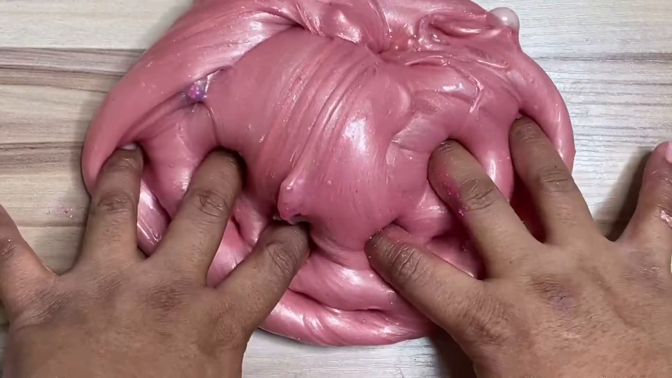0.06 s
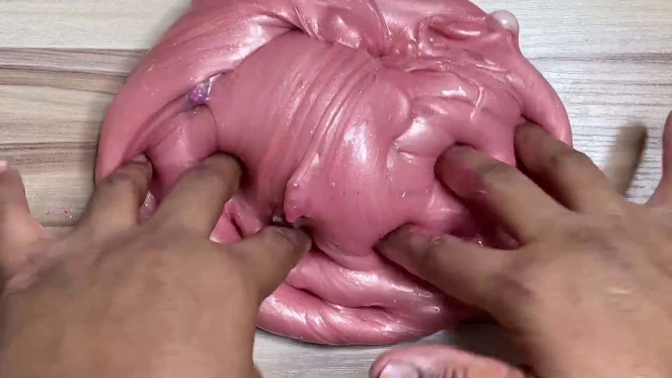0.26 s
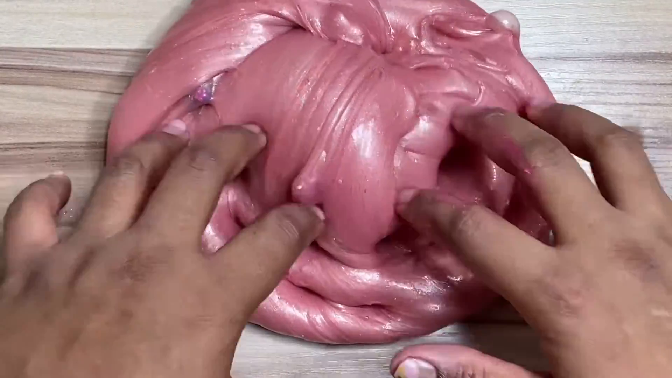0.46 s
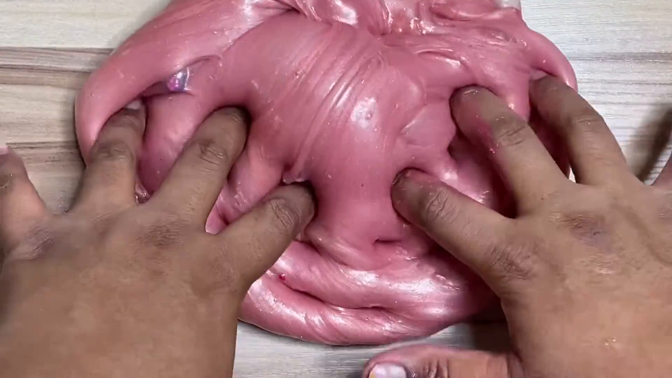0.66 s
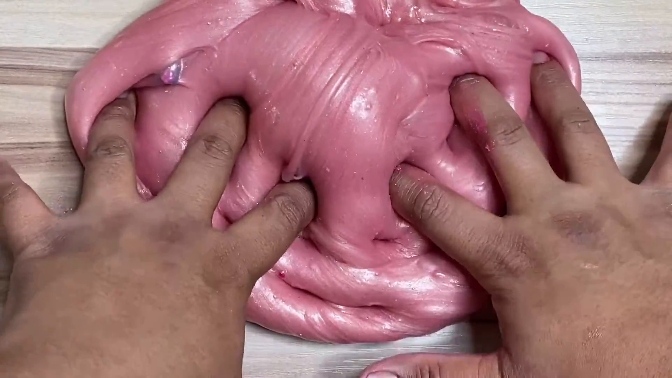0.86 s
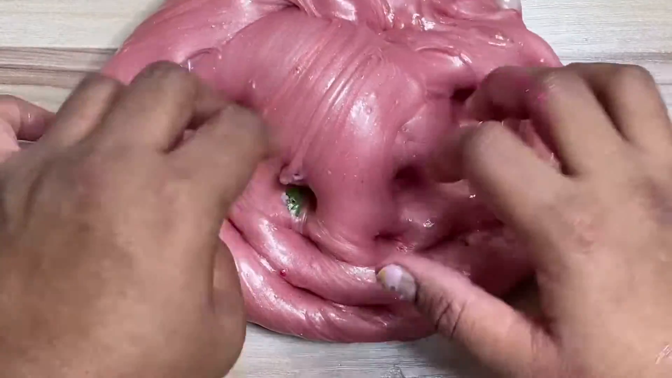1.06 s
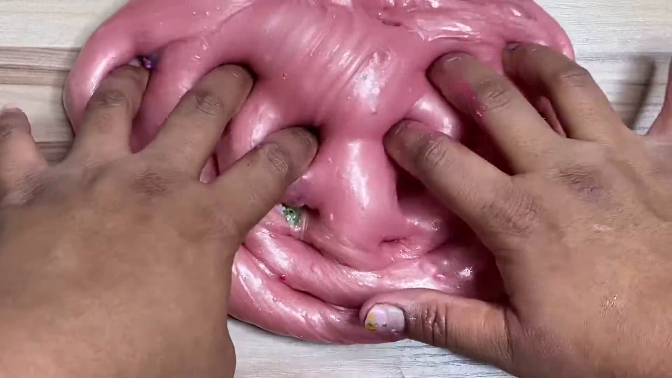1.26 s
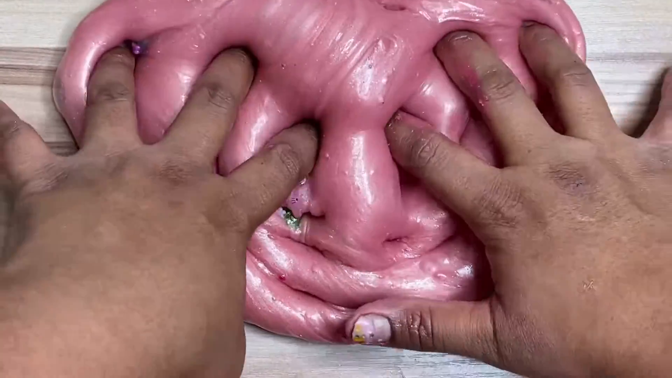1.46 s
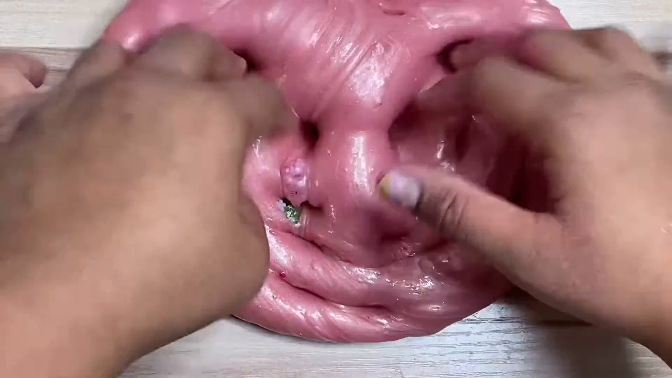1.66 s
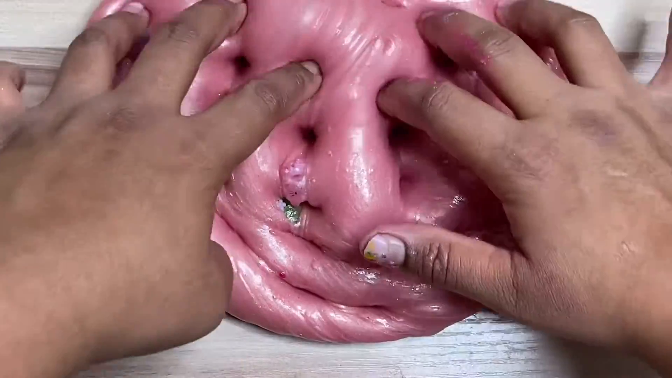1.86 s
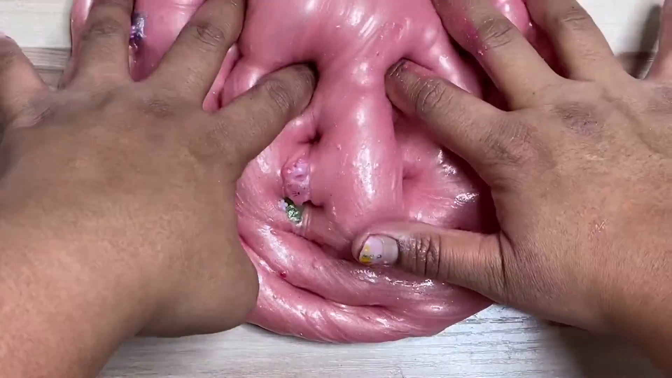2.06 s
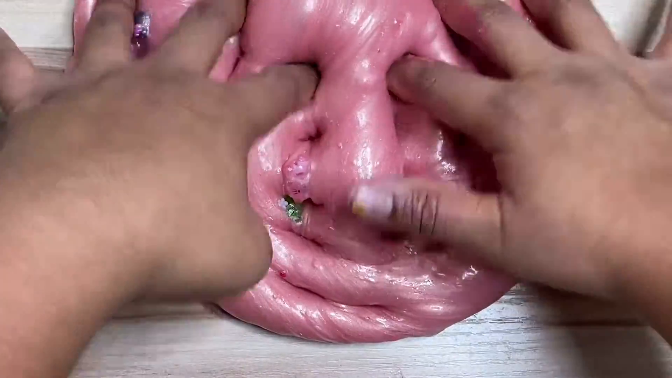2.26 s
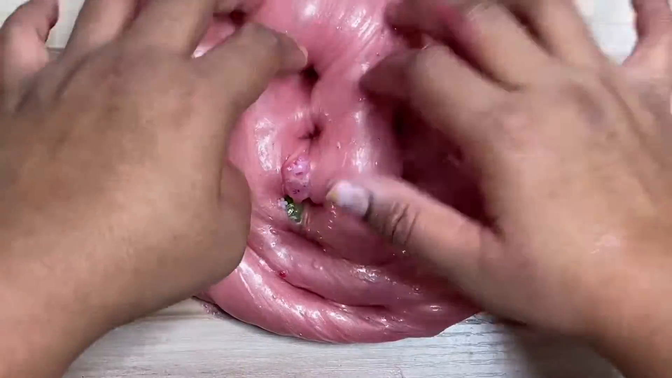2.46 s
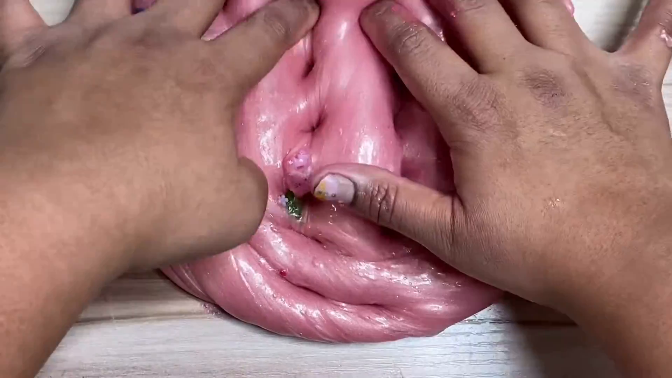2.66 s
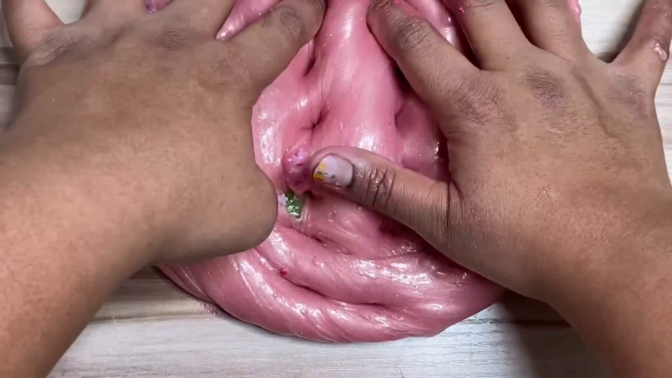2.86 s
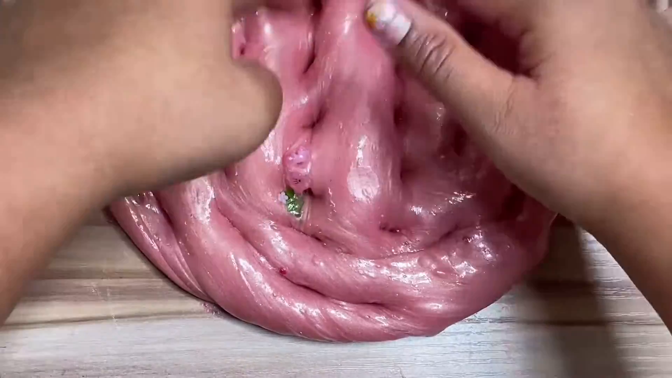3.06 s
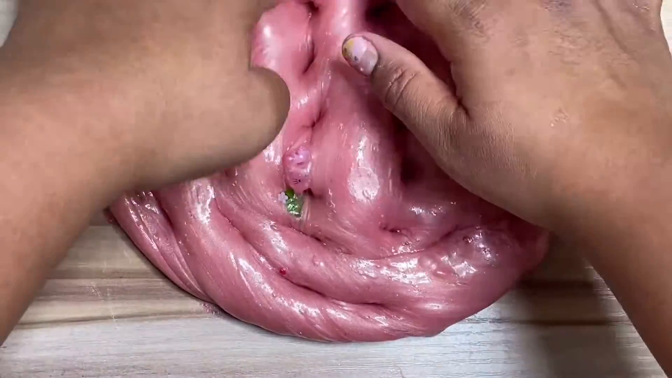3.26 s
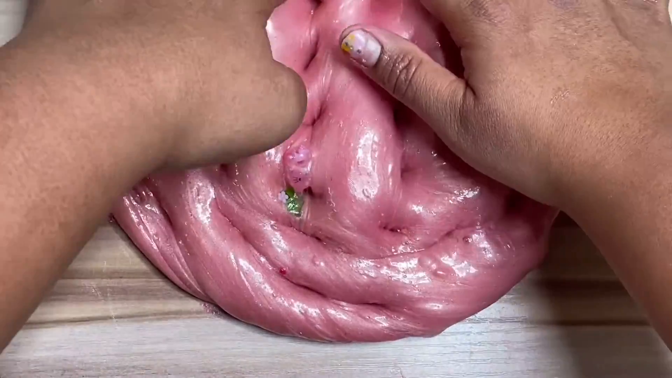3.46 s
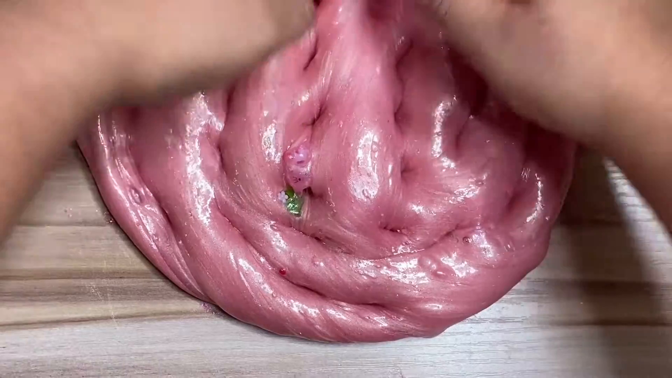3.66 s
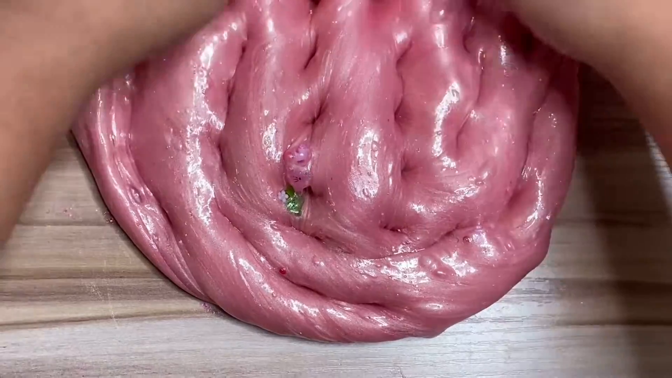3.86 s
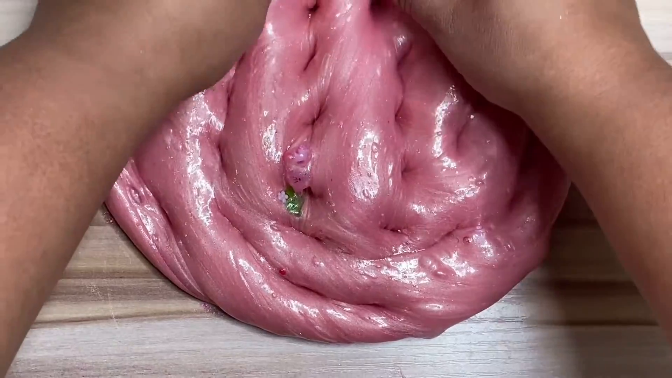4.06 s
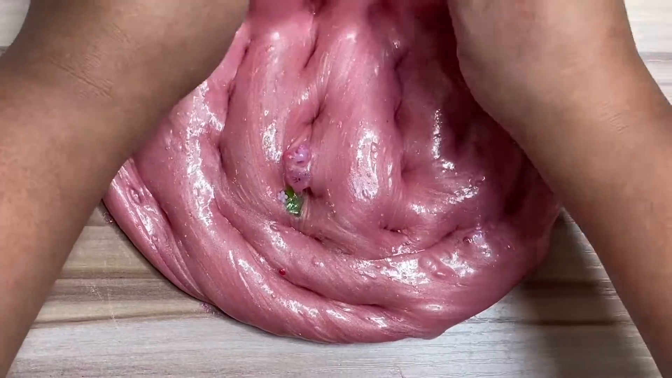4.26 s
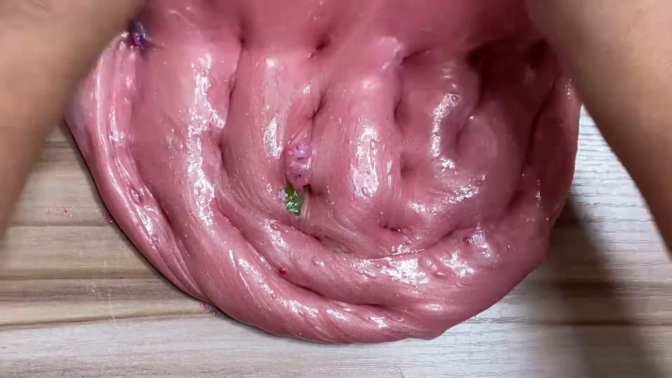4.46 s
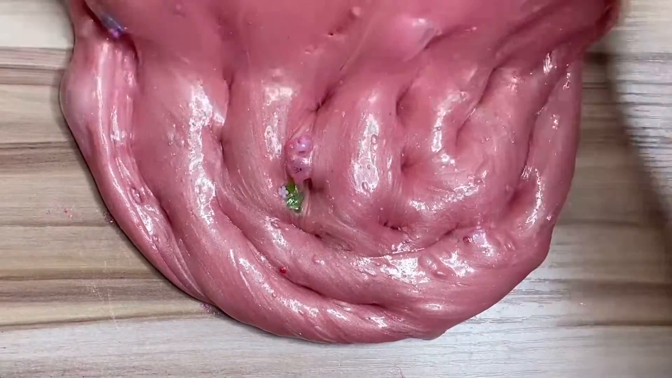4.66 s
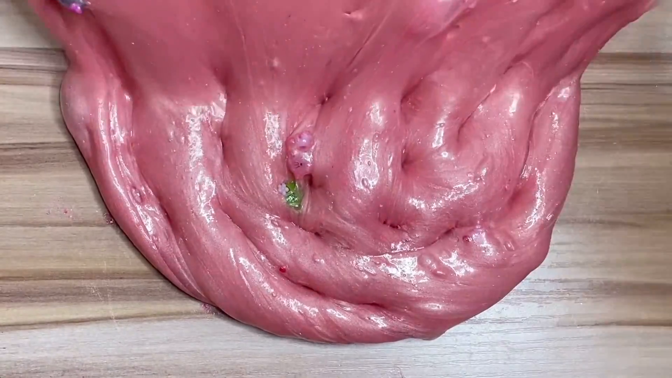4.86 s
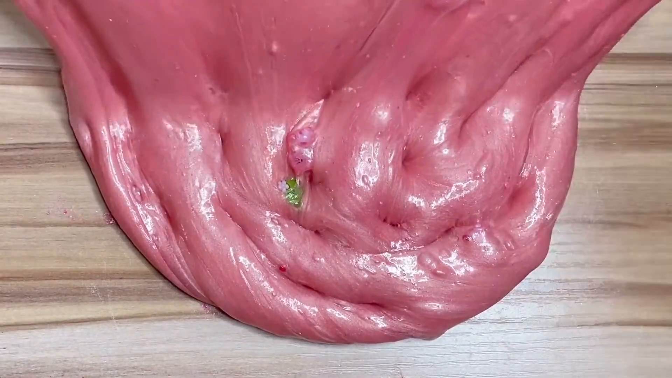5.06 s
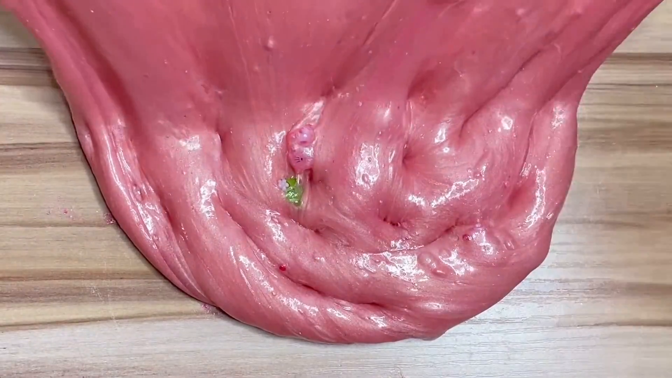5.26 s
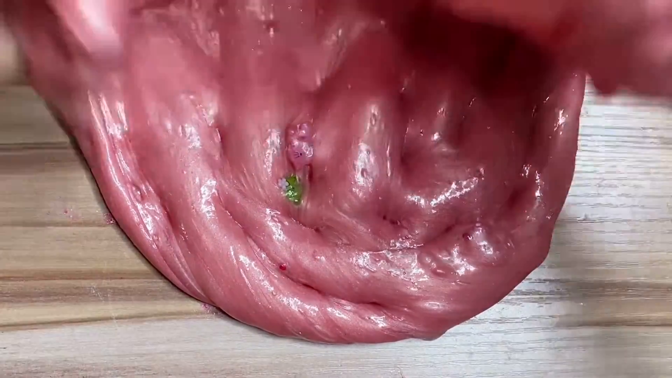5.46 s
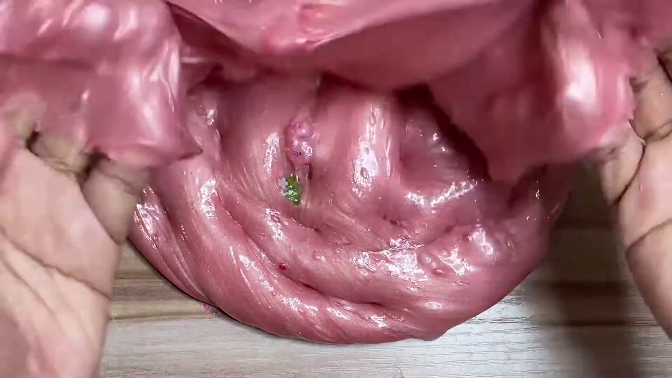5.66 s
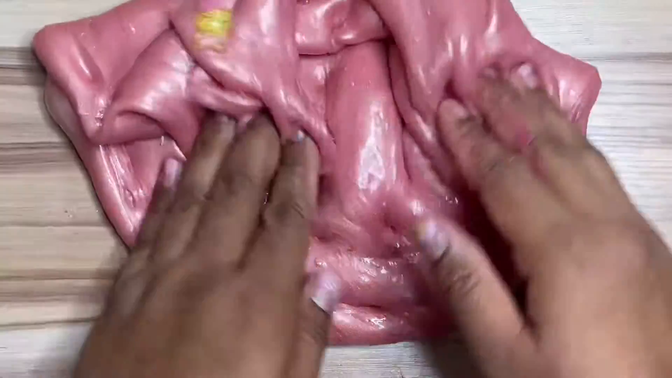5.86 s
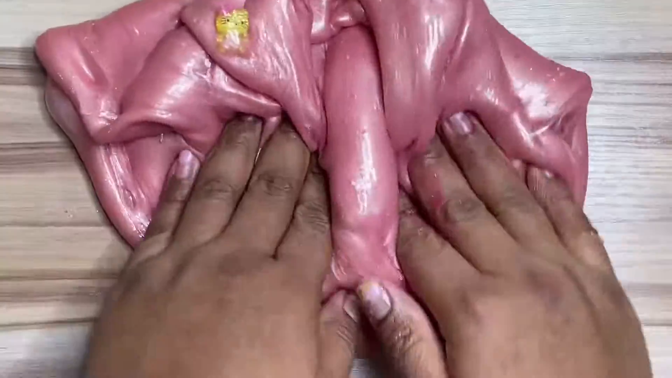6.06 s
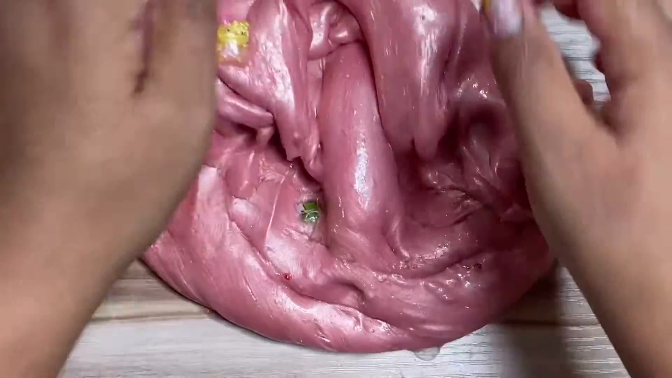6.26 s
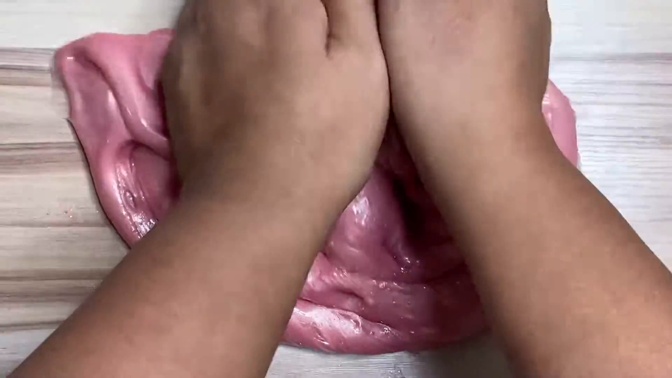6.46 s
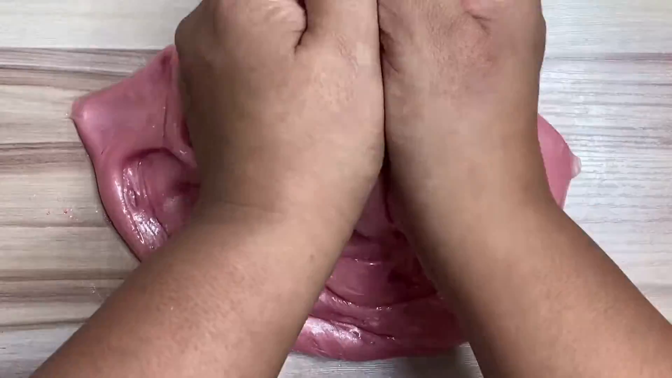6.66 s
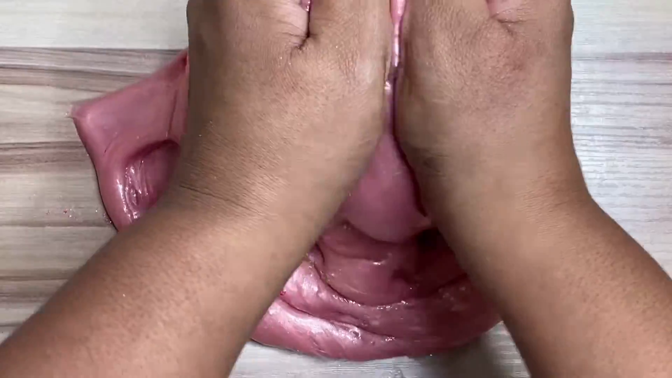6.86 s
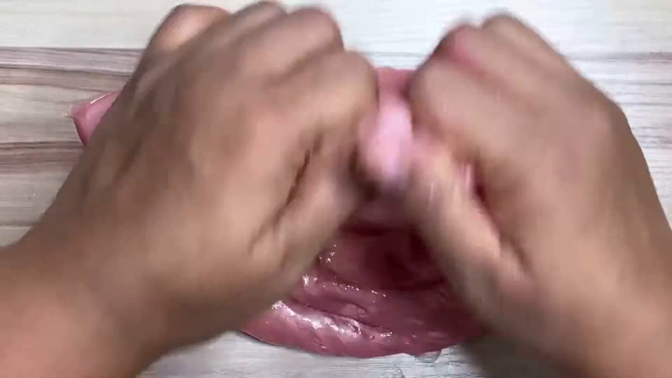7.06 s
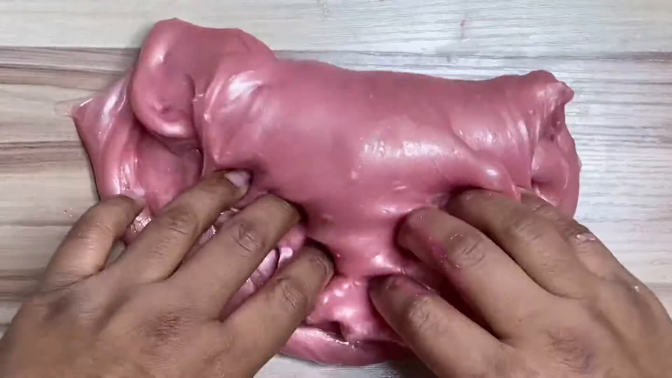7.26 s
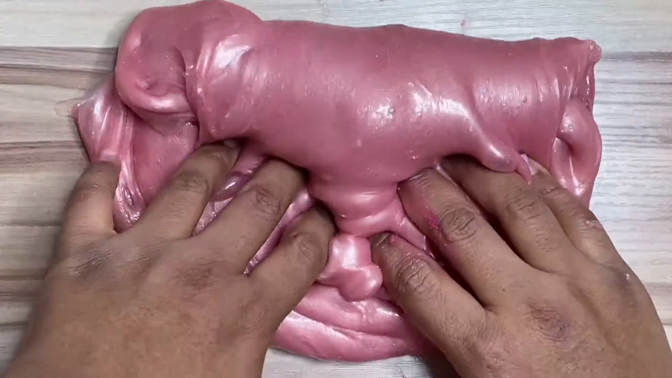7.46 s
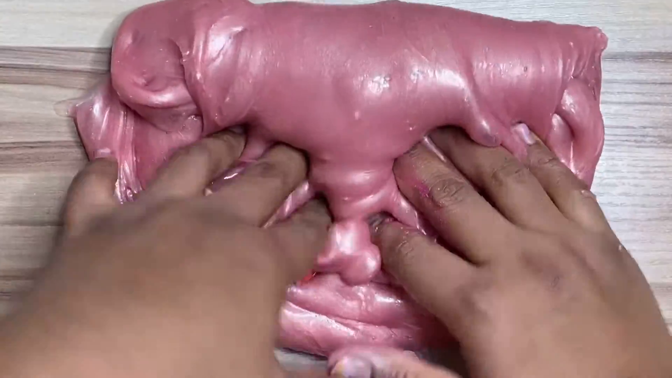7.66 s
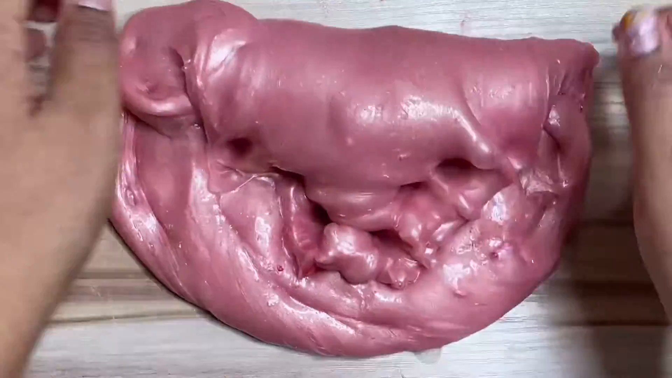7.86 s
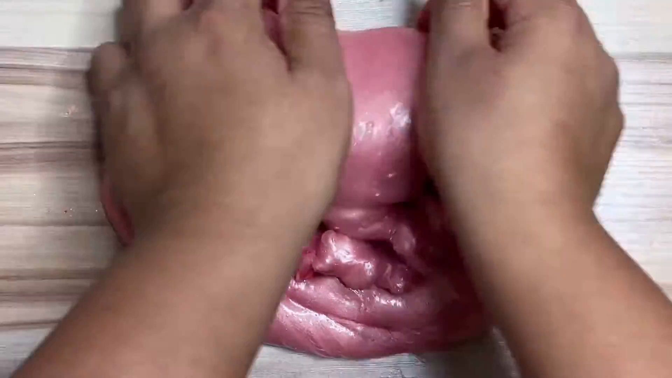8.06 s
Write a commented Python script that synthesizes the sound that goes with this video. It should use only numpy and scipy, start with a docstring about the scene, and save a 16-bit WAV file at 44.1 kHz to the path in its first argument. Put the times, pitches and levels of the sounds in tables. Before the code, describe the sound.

Six regular bursts of sharp, sticky snapping come from hands pressing wet slime, each with a dull table thump and a fizzing edge. A low flutter of air buffets the microphone, followed by sparse, faint ticks during stretching. Folding brings low thuds, then the loudest hollow pops, a pause and another cluster of cracks. The stereo sound is very close, in a quiet, lively little room.

```python
"""Clusters of wet cracks burst out close by as fingers poke, stretch and fold glossy slime on a table.
Each burst is torn noise that rings an air pocket, a damped resonance; presses excite lower resonances.
Peeling slime crackles as random grains and ticking bubbles, and the table rumbles as coloured noise.
Midway, as the arms reach forward, moving air buffets the microphone; a small bare room echoes the slime.
"""
import sys
import numpy as np
from scipy import signal
from scipy.fft import rfft, irfft, next_fast_len
from scipy.io import wavfile
from scipy.ndimage import uniform_filter1d

SR = 44100
rng = np.random.default_rng(int(sys.argv[2]) if len(sys.argv) > 2 else 0)


def wav_record(signal):
    """Record a signal, one row per channel, as 16-bit PCM in the file named by sys.argv[1]."""
    frames = np.transpose(np.atleast_2d(signal))
    bounded = np.clip(frames, -1, 1)
    # unit amplitude maps onto the largest positive 16-bit level
    quanta = np.round(bounded * 32767).astype(np.int16)
    wavfile.write(sys.argv[1], SR, quanta)


N = 358533
TIME = np.arange(N) / SR

# The mass gives way under the hands or lands on the table. Each row: start in seconds, relative squelch
# level in dB, squelch centre in Hz, squelch 60 dB decay in seconds, relative thump level in dB,
# crackle level in dB, crackle build-up in seconds.
PRESSES = [(.305, -23, 433, .12, -32, -49.5, .022), (1.009, -21, 379.5, 0.2, -30, -50, 0.031),
           (1.673, -19.5, 406, 0.13, -27.5, -53, 0.025), (2.366, -27, 448.5, 0.11, -30.5, -63.5, .025),
           (3.087, -33, 400, 0.11, -31.5, -57, 0.059), (3.717, -42, 401, .08, -34, -57, 0.039),
           (4.44, -48.5, 328, .06, -41, -51, 0.019), (4.821, -43.5, 310, 0.044, -55, -59, .01),
           (5.501, -40, 219, 0.098, -51, -62, .008), (6.185, -37, 219, 0.18, -34, -46, 0.021),
           (6.383, -28, 193, 0.053, -31, -44, .004), (6.56, -33.5, 229, .08, -30.5, -49.5, .006),
           (6.728, -31, 420, 0.16, -48.5, -58, .01), (7.747, -21, 342, 0.097, -28, -54.5, 0.03),
           (7.96, -35.5, 235, 0.024, -37, -46.5, .008)]
THUMP_LAG_S = 0.012  # the push reaches the table just after the squelch


def pops(rise_s, snap_s, fizz_s, ring_cycles, width, snap_db, fizz_db, ring_db):
    """Impulsive excitation of a damped resonator: a snap, a wet fizz and air ringing in a soft pocket."""
    # Bursting air pockets. Each row: time in seconds, relative snap level in dB, relative fizz level in dB,
    # pocket resonance in Hz, relative ring level in dB.
    bursts = [(0.098, -64, -61, 4370, -72.5), (0.285, -52.5, -58.5, 800, -47.5),
              (0.2921, -28.5, -21.5, 710, -30.5), (.3051, -23.5, -9.5, 655, -26),
              (0.3076, -27.5, -15.5, 1290, -20.5), (1.0041, -24.5, -6.5, 3740, -16.5),
              (1.009, -38, -15, 590, -16.5), (1.031, -30, -36, 1260, -19.5), (1.0426, -17, -9.5, 4280, -33),
              (1.399, -54, -43.5, 4630, -53.5), (1.4361, -46, -24, 4690, -35),
              (1.6523, -30, -19, 2010, -32.5), (1.6565, -23, -18.5, 1640, -23.5),
              (1.667, -15.5, -21, 4400, -28), (1.6762, -32, -15.5, 1010, -19),
              (1.6827, -25.5, -26, 1600, -31), (1.9553, -46.5, -66, 800, -42.5),
              (2.035, -52.5, -53.5, 3000, -48.5), (2.7, -63.5, -59.5, 2000, -65.5),
              (2.3377, -28, -15, 3340, -21), (2.3471, -22.5, -5, 1690, -23),
              (2.3649, -24.5, -22, 4500, -19), (2.3672, -33, -15, 716, -24.5),
              (2.3726, -40, -7.5, 4000, -23), (3.056, -44.5, -34.5, 650, -44.5),
              (3.064, -20, -13.5, 4650, -22), (3.0862, -18.5, -17.5, 663, -21),
              (3.091, -28, -15.5, 650, -19.5), (3.0921, -28, -28, 1240, -28),
              (3.2488, -65, -41.5, 850, -66.5), (3.701, -38.5, -23, 3890, -42),
              (3.7053, -23.5, -11.5, 3820, -48), (3.7297, -29, -15, 887, -18),
              (4.1558, -31.5, -41, 2820, -44), (4.3571, -45.5, -25.5, 4760, -31),
              (4.4478, -19.5, -20.5, 2400, -48), (4.502, -58, -19, 3430, -29.5),
              (4.5846, -38.5, -24.5, 3960, -29), (4.6758, -46, -25, 2350, -36),
              (4.683, -54, -22, 4000, -54), (4.8214, -24.5, -13.5, 1840, -21),
              (4.9414, -46, -68.5, 2190, -38.5), (5.1049, -46.5, -51, 2250, -32.5),
              (5.3207, -52.5, -34, 4290, -33), (5.4995, -52, -55.5, 1540, -41),
              (5.6148, -57, -58, 2200, -43), (5.7825, -43.5, -60, 1430, -40.5),
              (5.912, -38, -34.5, 1910, -41.5), (5.988, -40.5, -45, 1240, -40),
              (6.0064, -41, -49, 1500, -41.5), (6.387, -39.5, -65, 560, -29),
              (6.5633, -33, -39, 466, -24.5), (6.6207, -30.5, -36, 3040, -37),
              (6.6698, -66, -24, 4760, -57), (6.6832, -44, -22, 4380, -56), (6.711, -25.5, -14, 4280, -30),
              (6.7227, -53, -16.5, 5010, -20.5), (6.8197, -15.5, -29, 4010, -5.5),
              (6.8365, -20, -12.5, 915, -25.5), (6.921, -21.5, -26, 2700, -28),
              (6.948, -10.5, -11.5, 2444, -4), (6.9499, -20, -21, 2030, -7.5),
              (6.9508, -17, -26.5, 1120, -19), (7.131, -34.5, -34.5, 4590, -40),
              (7.389, -48.5, -49, 2400, -49), (7.398, -40.5, -46, 2300, -56),
              (7.7387, -22, -19.5, 2060, -25), (7.7529, -28.5, -25.5, 470, -18),
              (7.7643, -27, -20, 4970, -35), (7.7795, -24, -23.5, 416, -24.5),
              (7.952, -41, -59, 590, -32.5)]
    # Spectra of snap and fizz. Each row: frequency in Hz, relative level in dB.
    snap_spectrum = [(150, -21.5), (400, -6), (900, -5), (1500, -5), (2200, -3.5), (3200, -3.5),
                     (5200, -1.5), (7000, -7), (12000, -27)]
    fizz_spectrum = [(1500, -32), (4500, -7.5), (6500, -2), (9500, 0), (12000, -6), (15300, -1.5),
                     (16500, -15)]
    snaps, fizzes, rings = np.zeros((3, N))
    t = TIME[:SR // 20] - TIME[SR // 80]  # begins before the rip, which is at t = 0
    noises = rng.standard_normal((len(bursts), 3, len(t)))
    for (s, snap, fizz, hz, ring), noise in zip(bursts, noises):
        start = s + t[0]
        snap_sound = tear(noise[0], t, rise_s, snap_s)
        fizz_sound = tear(noise[1], t, rise_s, fizz_s)
        puff = tear(noise[2], t, rise_s, ring_cycles / hz)
        ring_sound = signal.sosfilt(resonance(hz, width), puff)
        add(snaps, start, at_level(snap_sound, snap + snap_db))
        add(fizzes, start, at_level(fizz_sound, fizz + fizz_db))
        add(rings, start, at_level(ring_sound, ring + ring_db))
    return colour(snaps, snap_spectrum) + colour(fizzes, fizz_spectrum) + rings


def tear(noise, t, rise_s, decay_s):
    """Sudden release of tension: a strained film creaks faintly, then at t = 0 rips open in a brief rush."""
    strain_db, strain_s = -23, 0.002  # creak relative to the rush; its decay to either side of the rip
    after = np.maximum(t, 0)
    rush = (1 - np.exp(-(after / rise_s) ** 2)) * np.exp(-after / decay_s)
    creak = from_db(strain_db) * np.exp(-np.abs(t) / strain_s)
    return noise * (rush / rush.max() + creak)


def thuds(width, rise_s, level_db):
    """Low resonances excited by a shove: the soft mass squelches, then thumps on the table."""
    thump_hz, thump_t60_s = 143, 0.13
    out = np.zeros(N)
    noises = rng.standard_normal((len(PRESSES), 2, SR // 4))
    for (s, squelch_db, hz, t60, thump_db, *_), noise in zip(PRESSES, noises):
        squelch = shudder(noise[0], hz, t60, width, rise_s)
        thump = shudder(noise[1], thump_hz, thump_t60_s, width, rise_s)
        add(out, s, at_level(squelch, squelch_db + level_db))
        add(out, s + THUMP_LAG_S, at_level(thump, thump_db + level_db))
    return out


def shudder(noise, hz, t60, width, rise_s):
    """Exponential decay in a heavily damped mode: a noisy shove dies away in a broad resonance."""
    t = TIME[:len(noise)]
    shove = noise * (1 - np.exp(-t / rise_s)) * from_db(-60 * t / t60)
    return signal.sosfilt(resonance(hz, width), shove)


def crackle(peel_db, per_s, busy_db, spread_db, rub, grain_s):
    """Random (Poisson-like) grains: sticky threads snap more often under harder peeling, over a skin rub."""
    # Each row: frequency in Hz, relative level in dB.
    crackle_spectrum = [(200, -18.5), (900, -3.5), (2200, -4), (4500, -6.5), (7000, -9), (10000, -11),
                        (16000, -12)]
    rate = per_s * from_db(np.minimum(peel_db - busy_db, 0)) ** 2  # snaps per second, full at busy_db
    born = rng.random(N) < rate / SR
    sizes = from_db(spread_db * np.minimum(rng.exponential(1, N), 3)) * born
    # each snap dies away exponentially
    envelope = signal.lfilter([1], [1, -np.exp(-1 / (grain_s * SR))], sizes + 1e-18)
    grains = 0.5 * (rms_one(envelope) + rub) * rng.standard_normal(N)
    return colour(grains * from_db(peel_db), crackle_spectrum)


def tiny_bubbles(peel_db, per_s, low_hz, high_hz, q, spread_db, level_db, count):
    """Resonance of small cavities: pinhead bubbles tick open at random, each dealt one of a set of pitches."""
    born = rng.random(N) < per_s / SR
    sizes = from_db(spread_db * np.minimum(rng.exponential(1, N), 2)) * born
    dealt = rng.integers(0, count, N)
    ticks = np.zeros(N)
    for k, hz in enumerate(np.geomspace(low_hz, high_hz, count)):
        b, a = signal.iirpeak(hz, q, fs=SR)
        ticks += signal.lfilter(b, a, sizes * (dealt == k) + 1e-18) / np.sqrt(hz)
    return rms_one(ticks) * from_db(peel_db + level_db)


def peeling():
    """Power addition of two causes: slime peels off skin around each press and while the sheet stretches."""
    # Lifting, stretching and folding the sheet. Each row: time in seconds, crackle level in dB.
    stretch = [(3.7, -89.5), (4.1, -67), (4.58, -53.5), (4.9, -63), (5.3, -62.5), (5.45, -69), (5.8, -58),
               (6.1, -69), (6.35, -72), (6.48, -56.5), (7.1, -50), (7.4, -72.5), (7.92, -75), (8.07, -54.5)]
    cling_fall_s = 0.06  # slime clings to the skin after each press
    s, *_, crackle_db, build_up_s = np.transpose(PRESSES)
    cling = swells(s, crackle_db, build_up_s, cling_fall_s)
    return 20 * np.log10(np.hypot(cling, from_db(in_time(stretch)[0])))


def swells(times, levels_db, rises_s, fall_s):
    """Incoherent (power) sum of exponential gains that build up to each press and die away after it."""
    power = np.zeros(N)
    for s, db, rise_s in np.broadcast(times, levels_db, rises_s):
        t = TIME - s
        decay = np.minimum(np.maximum(-t / rise_s, t / fall_s), 20)
        power += from_db(db) ** 2 * np.exp(-2 * decay)
    return np.sqrt(power)


def buffet(eddies_hz, lump_db, push_db, flutter_db):
    """Turbulent pressure on the microphone: air pushes at low frequency and flutters in lumps higher up."""
    # Moving air. Each row: time in seconds, relative push level in dB, relative flutter level in dB.
    gusts = [(3.96, -65.5, -71), (3.995, -29, -56), (4.16, -16, -19.5), (4.21, -20.5, -36),
             (4.35, -25, -30), (4.395, -35.5, -44), (4.55, -37, -45.5), (4.6, -43.5, -68.5),
             (4.7, -43, -71), (4.82, -73, -83)]
    # Spectra of push and flutter. Each row: frequency in Hz, relative level per Hz in dB.
    push_spectrum = [(22, -32), (37, -9), (55, 0), (110, -0.5), (170, -2), (230, -15.5), (350, -27),
                     (600, -70)]
    flutter_spectrum = [(100, -51), (200, 3.5), (300, 2.5), (420, -9), (580, -18.5), (750, -38.5),
                        (1500, -55.5)]
    push, flutter = in_time(gusts)
    blowing = (TIME > gusts[0][0]) & (TIME < gusts[-1][0])
    slow = signal.butter(2, eddies_hz, fs=SR, output="sos")
    eddies = rms_one(signal.sosfilt(slow, rng.standard_normal(N)))
    lumps = rms_one(from_db(lump_db * np.tanh(eddies))) * blowing
    push_noise = rng.standard_normal(N) * blowing * from_db(push + push_db)
    flutter_noise = rng.standard_normal(N) * lumps * from_db(flutter + flutter_db)
    return colour(push_noise, push_spectrum) + colour(flutter_noise, flutter_spectrum)


def varied_room(x, turns_per_s, count):
    """Diffuse reverberation: random echo patterns take turns, so no single pattern colours the tails."""
    turn = np.floor(TIME * turns_per_s) % count
    echoes = np.zeros((2, N))
    for k in range(count):
        active = uniform_filter1d(1.0 * (turn == k), size=64)  # short crossfades between patterns
        echoes += room(x * active, gap_s=0.002, early_db=8.5, early_t60=0.2, wet_db=0.0)
    return echoes


def room(x, gap_s, early_db, early_t60, wet_db):
    """Reverberation: strong early echoes from table and near walls, then a tail that dies band by band."""
    # Each row: frequency in Hz, 60 dB decay time of the tail in seconds.
    tail_t60 = [(100, 0.26), (400, 0.7), (1000, 0.64), (2300, 0.59), (5000, 0.5), (10000, 0.43),
                (16000, 0.32)]
    # Each row: frequency in Hz, echo level over the direct sound in dB.
    echo_db = [(100, -2), (400, -1.5), (1000, -2), (2300, -3), (5000, -7.5), (10000, -8), (16000, -12.5)]
    # Each row: frequency in Hz, likeness of the left and right echoes from 0 to 1.
    likeness = [(100, 1), (250, 0.5), (600, 0), (1400, 1), (2300, 0.89), (5000, 1), (10000, 1),
                (16000, .35)]
    t, echo = TIME[:SR * 4 // 5], 0
    edges = np.geomspace(60, 17000, 17)  # band edges in Hz
    white = rng.standard_normal((2, 2, len(t)))
    for k, (low, high) in enumerate(zip(edges, edges[1:])):
        band = signal.butter(2, [low, high], "band", fs=SR, output="sos")
        mid, side = signal.sosfilt(band, white[k % 2])  # neighbouring bands use different noise
        hz = np.sqrt(low * high)
        alike = np.clip(at_hz(likeness, hz), 0, 1)
        tail = from_db(-60 * t / at_hz(tail_t60, hz))
        early = from_db(early_db - 60 * t / early_t60)
        fade = (tail + early) * (1 - np.exp(-(t / gap_s) ** 2))
        gain = from_db(at_hz(echo_db, hz) + wet_db) / np.sqrt(2 * np.sum(fade ** 2))
        stereo = np.sqrt(1 + alike) * mid + np.sqrt(1 - alike) * side * [[1], [-1]]
        echo = echo + gain * fade * stereo
    return signal.oaconvolve(x[None], echo, axes=1)[:, :N]


def table_rumble():
    """Structure-borne noise: the table rumbles under the weight of the hands and shakes around each thump."""
    # Each row: frequency in Hz, relative level per Hz in dB.
    rumble_spectrum = [(20, -22), (45, -2), (90, -4.5), (125, -0.5), (170, -6.5), (250, -15.5),
                       (400, -19.5), (700, -36), (1500, -43.5), (4000, -71.5)]
    # Weight of the hands, least while the sheet is held up. Each row: time in seconds, rumble level in dB.
    lean = [(0, -61), (.9, -61), (3.6, -64), (4.7, -56.5), (5, -76), (5.45, -72.5), (5.9, -65),
            (6.3, -58.5), (6.55, -43), (6.8, -52), (7, -50.5), (7.5, -64.5), (8.13, -51.5)]
    shake_db, shake_rise_s, shake_fall_s = -13, 0.033, 0.17  # level relative to the thump column
    s, *_, thump_db, _, _ = np.transpose(PRESSES)
    shake = swells(s + THUMP_LAG_S, thump_db + shake_db, shake_rise_s, shake_fall_s)
    noise = colour(rng.standard_normal(N), rumble_spectrum)
    return noise * np.hypot(shake, from_db(in_time(lean)[0]))


def background_hiss():
    """Stationary random noise: a faint steady hiss shaped by a fixed spectrum."""
    # Each row: frequency in Hz, relative level per Hz in dB.
    hiss_spectrum = [(30, 9), (200, 6), (600, -0.5), (1500, -10.5), (3000, -12), (5000, -11), (8000, -13),
                     (11000, -11), (16000, -22)]
    return colour(rng.standard_normal(N), hiss_spectrum) * from_db(-74)


def from_db(db):
    """Logarithmic level: decibels to amplitude gain."""
    return 10 ** (np.asarray(db) / 20)


def rms_one(x):
    """Power normalisation: scale to rms 1."""
    return x / np.sqrt(np.mean(x ** 2) + 1e-20)


def in_time(rows):
    """Linear interpolation: each column of a curve at every sample."""
    s, *columns = np.transpose(rows)
    return [np.interp(TIME, s, c) for c in columns]


def at_hz(points, hz):
    """Logarithmic pitch scale: read a table on a log-frequency axis."""
    f, value = np.transpose(points)
    return np.interp(np.log(np.maximum(hz, 1)), np.log(f), value)


def resonance(hz, width):
    """Damped resonance: a band-pass whose edges lie a factor 1 + width either side of hz."""
    return signal.butter(2, [hz / (1 + width), hz * (1 + width)], "band", fs=SR, output="sos")


def colour(x, spectrum):
    """Causal minimum-phase filter by the folded cepstrum; white noise keeps its power."""
    size = 4096
    gain = rms_one(from_db(at_hz(spectrum, np.fft.rfftfreq(size, 1 / SR))))
    cepstrum = irfft(np.log(gain))
    cepstrum[1:size // 2] *= 2
    cepstrum[size // 2 + 1:] = 0
    return signal.oaconvolve(x, irfft(np.exp(rfft(cepstrum))))[:N]


def add(track, s, sound):
    """Superposition: mix a sound in at time s."""
    i = int(np.clip(round(s * SR), 0, N - 1))
    track[i:i + len(sound)] += sound[:N - i]


def at_level(sound, db):
    """Energy equivalence: give a short sound the energy of 4 ms at this rms level."""
    return sound * from_db(db) * np.sqrt(0.004 * SR / (np.sum(sound ** 2) + 1e-20))


def scene():
    """Superposition of close slime, its room echoes, the table's rumble, a faint hiss and moving air."""
    slime = pops(rise_s=0.00063, snap_s=0.0018, fizz_s=0.0013, ring_cycles=1.5, width=0.27,
                 snap_db=0.0, fizz_db=-3.0, ring_db=-2.0)
    slime = slime + thuds(width=0.6, rise_s=0.0016, level_db=2.0)
    peel_db = peeling()
    slime = slime + crackle(peel_db, per_s=1100, busy_db=-60.5, spread_db=5.5, rub=0.73, grain_s=0.0007)
    slime = slime + tiny_bubbles(peel_db, per_s=55, low_hz=1500, high_hz=4800, q=5,
                                 spread_db=5, level_db=-3, count=12)
    rumble = table_rumble()
    hiss = background_hiss()
    air = buffet(eddies_hz=36.6, lump_db=12, push_db=-0.85, flutter_db=0.5)
    echoes = varied_room(slime, turns_per_s=45, count=5)
    return slime + echoes + rumble + hiss + air


def record(dry):
    """Interchannel phase and level differences at two microphone ports, then hard clipping and a low-pass."""
    # Each row: frequency in Hz, phase in radians by which the left port leads.
    port_phase = [(20, 0), (200, 0), (650, -.5), (1600, -.1), (2500, .35), (5200, .35), (7300, 3.1),
                  (10500, 6.3), (13600, 9.4), (16700, 12.5)]
    # Each row: frequency in Hz, level in dB raised on the left and lowered on the right.
    port_tilt = [(100, 0), (200, -0.28), (350, 1.8), (800, 0.91), (1500, 0.83), (5000, 0.21), (12000, -.1)]
    cutoff_hz = 16200
    size = next_fast_len(N + SR // 10)
    hz = np.fft.rfftfreq(size, 1 / SR)
    lead = np.interp(hz, *np.transpose(port_phase))
    tilt = from_db(at_hz(port_tilt, hz))
    responses = np.array([tilt, np.exp(-1j * lead) / tilt])
    ports = irfft(rfft(dry, size) * responses, size)[:, :N]
    overloaded = np.clip(ports, -0.9, 0.9)
    low_pass = signal.firwin(161, cutoff_hz, fs=SR)
    return signal.oaconvolve(overloaded, low_pass[None], "same", axes=1)


dry = scene()
out = record(dry)
wav_record(out)
```